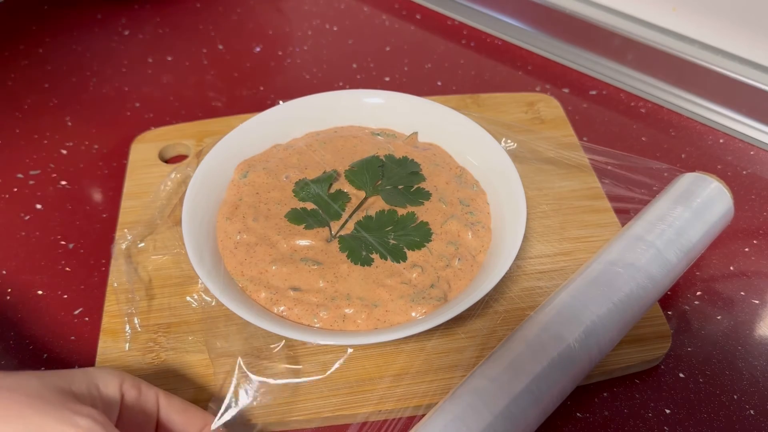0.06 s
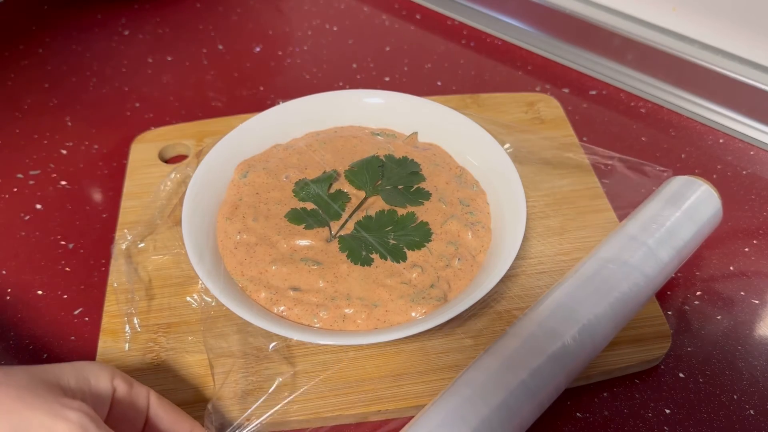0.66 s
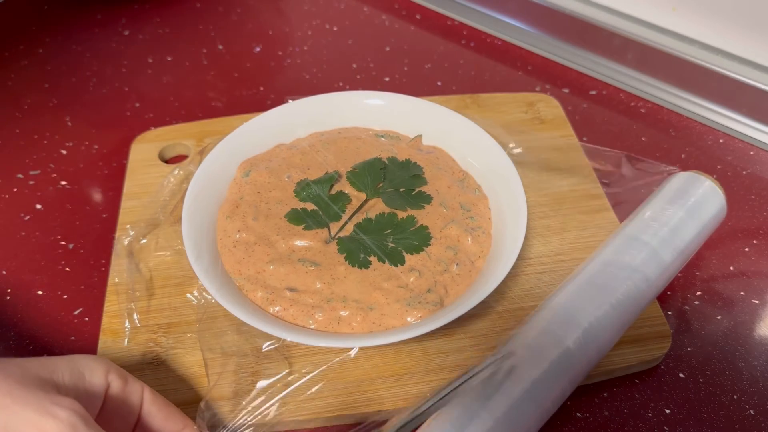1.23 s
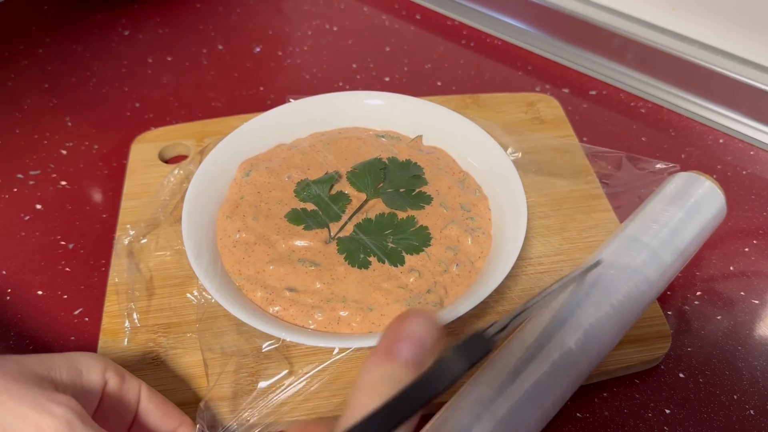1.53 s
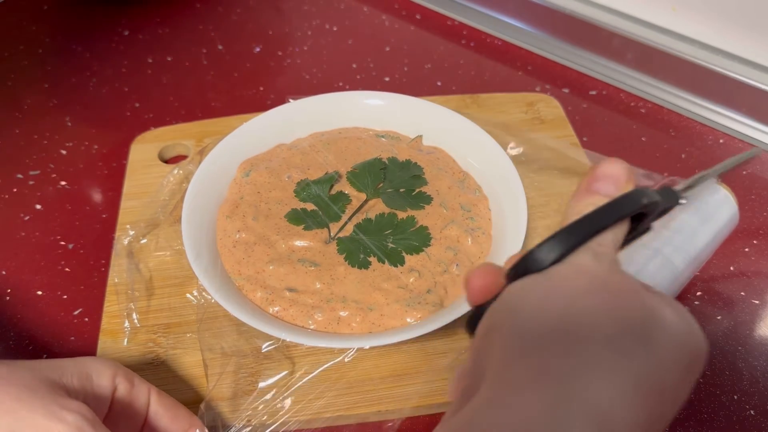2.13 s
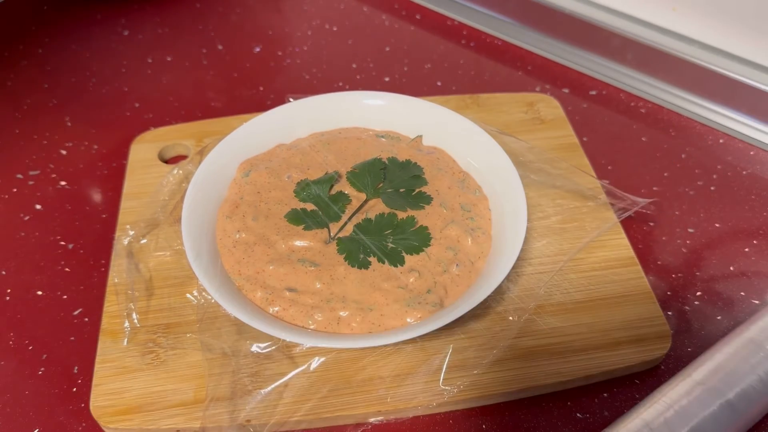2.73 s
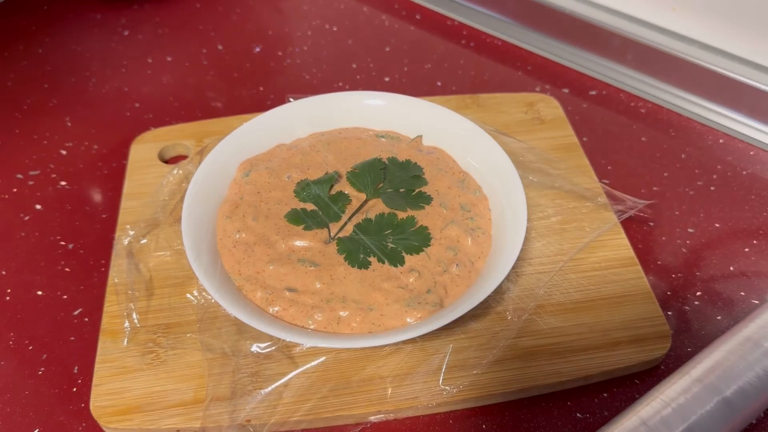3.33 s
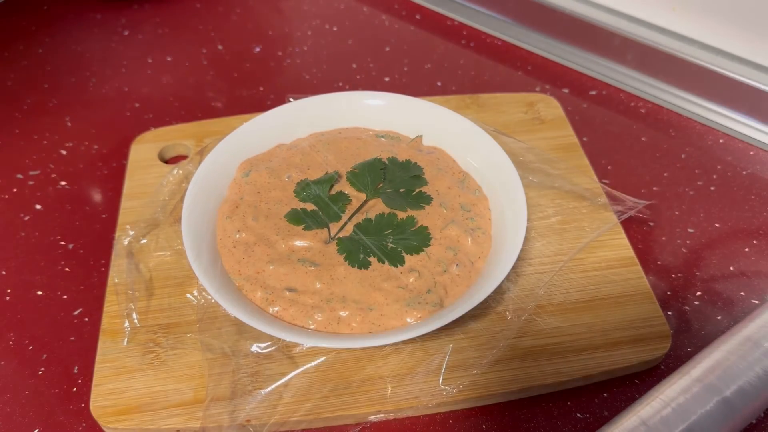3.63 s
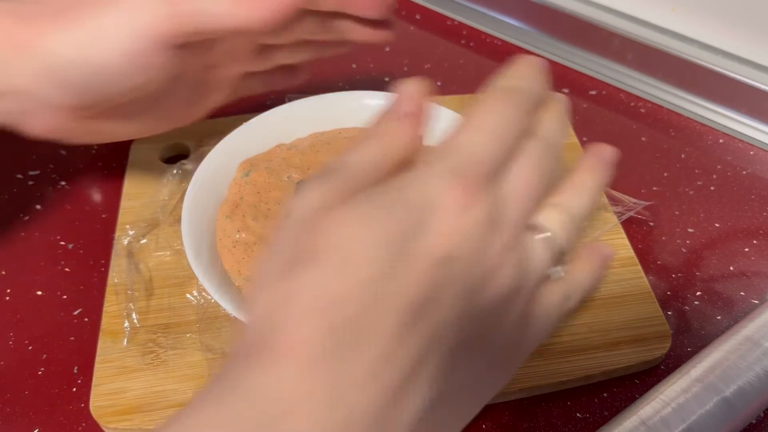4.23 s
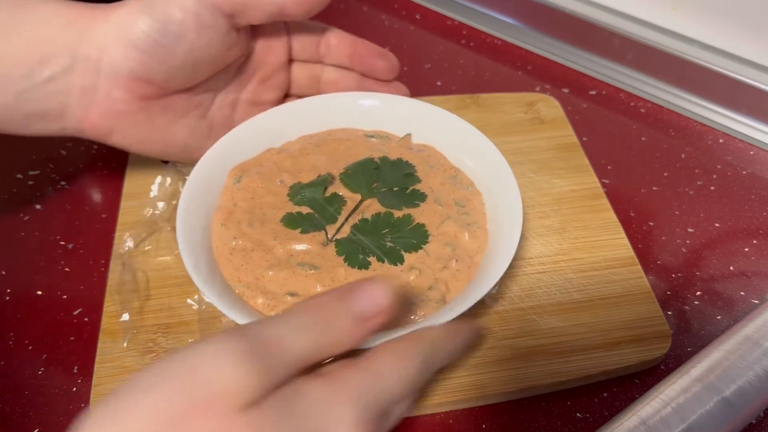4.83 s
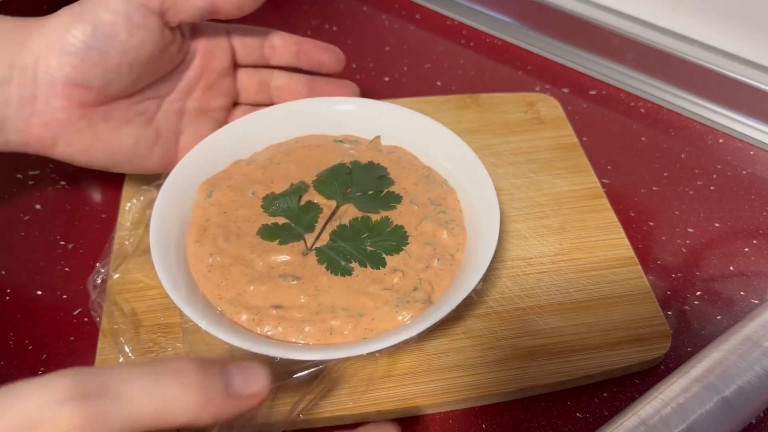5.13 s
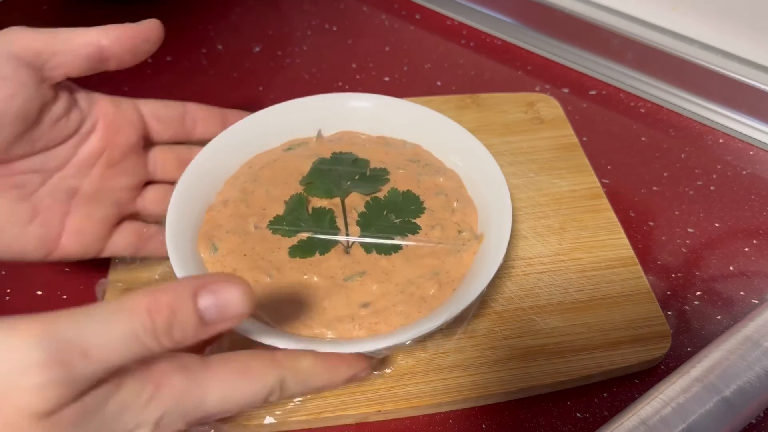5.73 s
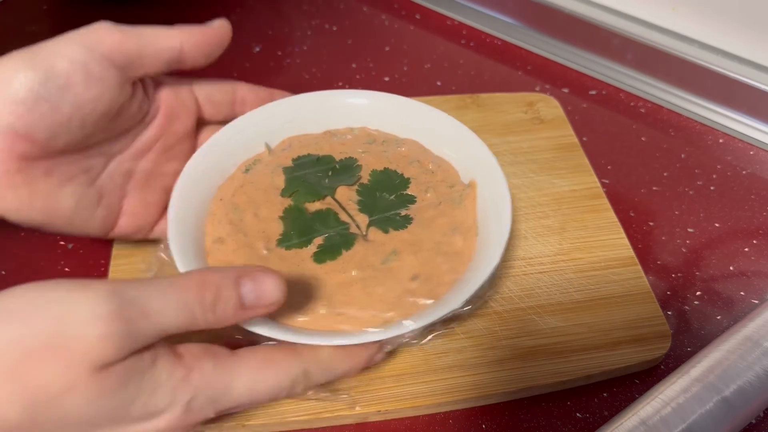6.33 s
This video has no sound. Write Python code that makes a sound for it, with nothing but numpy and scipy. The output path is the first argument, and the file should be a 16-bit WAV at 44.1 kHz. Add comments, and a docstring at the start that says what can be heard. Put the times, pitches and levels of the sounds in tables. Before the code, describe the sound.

Over a steady low appliance hum, plastic wrap crinkles and squeaks as it is stretched, followed by a click of scissor blades and a short slicing rasp. Two loud clatters stand out as first the roll and then the scissors land on the counter. Quieter crackling follows as the wrap is tucked around a bowl, with faint thuds and scrapes on a wooden board. Everything sounds near, with slight kitchen reverberation.

```python
"""Cling film over a bowl

Film peels off its roll in tiny stick-slip events; creases snap, the taut sheet sings in short zips,
and scissors click and slit it. The roll drops on the counter and the scissors land in two knocks,
each impact exciting damped modes. Hands press the crackling film round the bowl and turn it, scraping,
on a wooden board. A small kitchen reverberates, and an appliance hums throughout."""
import sys
import numpy as np
from scipy import signal
from scipy.fft import rfft, irfft, next_fast_len
from scipy.io import wavfile
from scipy.ndimage import map_coordinates

SR = 44100
rng = np.random.default_rng(int(sys.argv[2]) if len(sys.argv) > 2 else 0)


def wav_out(sig):
    """Save sig, one row per channel (or a flat mono array), as 16-bit PCM at SR to the path in sys.argv[1]."""
    wavfile.write(sys.argv[1], SR, np.round(np.clip(np.atleast_2d(sig).T, -1, 1) * 32767).astype(np.int16))


N = 281358

# Levels in the tables are relative: each source applies its own gains.
# The appliance's tones: pitch_hz, level_db
HUM_TONES = [(59.7, -45.5), (119.4, -68), (179.1, -66.5), (479, -78.5), (598, -78.5), (678, -87)]
# Strokes that work the film: start_s, length_s, sheet_db, fizz_db, swell_db
PULL_STROKES = [(0, 0.37, -72.5, -67.5, 3), (.335, 0.23, -58, -61, 7), (.468, 0.073, -55, -51, -9),
                (.6, 0.08, -53, -56.5, -5), (.735, 0.085, -52.5, -52.5, 3), (.875, 0.29, -45.5, -44, 2.5),
                (1.245, 0.082, -46, -47.5, 7.5), (1.44, 0.11, -49, -45, -4), (1.93, 0.11, -55, -54.5, 3.5),
                (2.345, .16, -60.5, -69.5, 1.5)]
PRESS_STROKES = [(4.355, 0.1, -55, -56, 1.5), (4.5, 0.17, -60.5, -62, 6), (4.615, 0.11, -58, -56.5, -0.5),
                 (4.76, 0.067, -60.5, -64, 13), (4.92, 0.27, -62.5, -67, 0.5), (5.24, 0.12, -57.5, -54, 15),
                 (5.44, 0.2, -55.5, -53, 0), (5.685, 0.048, -54.5, -48, 3), (5.8, 0.22, -58, -52.5, 11.5),
                 (5.955, 0.09, -54, -48.5, 8.5), (6.15, 0.17, -61.5, -58.5, 11),
                 (6.295, 0.054, -49.5, -44, 8.5)]
# Strokes of the blades: start_s, length_s, sheet_db, tear_db, swell_db
SLIT_STROKES = [(1.515, 0.29, -38.5, -40, -1), (1.799, 0.1, -38, -37, 3.5)]
# Creases flipping over: start_s, tick_db, pop_hz, pop_over_tick_db
CREASE_SNAPS = [(0.061, -53, 2000, -16), (0.125, -47, 2200, -13), (0.406, -39.5, 2540, -25),
                (0.481, -30.5, 1110, -9), (0.494, -28, 1190, -12), (0.512, -30.5, 1180, -20),
                (0.548, -35, 1900, -14), (0.57, -33, 2200, -20), (0.734, -32, 1110, -9),
                (0.775, -34, 1660, -4), (0.825, -21.5, 1000, -14.5), (0.925, -25, 1380, -15),
                (2.061, -26.5, 1430, -15.5), (2.161, -48.5, 2240, -8), (4.033, -35.5, 3510, -29),
                (4.36, -41.5, 2270, -19), (4.823, -35, 1400, -9), (4.827, -40, 2280, -4),
                (4.915, -32.5, 2320, -16), (5.043, -42.5, 2000, 1), (5.131, -23.5, 2100, -11),
                (5.21, -45, 2000, -12), (5.468, -32, 1190, -6)]
# The taut sheet singing: start_s, length_s, pitch_hz, glide_octaves_per_s, level_db
SHEET_ZIPS = [(0.915, 0.078, 1190, 0.5, -57), (1.066, 0.077, 1384, -7, -45), (1.207, 0.18, 1240, 2, -53.5),
              (1.527, 0.13, 1120, 0.7, -44), (1.679, 0.13, 1550, -4, -46), (1.793, 0.087, 1230, 2, -42.5)]
# Impacts: start_s, level_db, thump_db, clack_db, crack_db, pan_db, contact_t60_s
ROLL_IMPACTS = [(1.269, -22, -0.5, -21, -6, 5.5, 0.038), (1.283, -35, 20.5, -20.5, -10, -1, 0.026),
                (1.319, -42, 4, 1, 6, 5, 0.025), (2.398, -53.5, 34.5, -5, -21.5, 2, 0.3),
                (2.436, -27, 6.5, -17, -10.5, 3.5, 0.3), (2.474, -42.5, 25.5, -10.5, -12.5, 5, 0.054),
                (2.527, -3, 0.5, 1.5, -3, 1, 0.021), (2.543, -23.5, 13.5, -13.5, -10, 0.5, 0.11),
                (2.572, -5, -4, -13.5, -8, 2.5, 0.043), (2.601, -6, -9.5, -4, -9, 1.5, 0.017)]  # bumps the board, then lands
SCISSOR_IMPACTS = [(3.504, -13.5, -1.5, -4.5, 0.5, 2.1, 0.11), (3.506, -19.5, 19, -15, -4, 5.5, 0.023),
                   (3.614, -35.5, 17, 0.5, -2, 3, 0.05), (3.693, -11.5, -4.5, 1, 5.5, 1.1, 0.046),
                   (3.698, -12, 1, 5, 2, 2.8, 0.033)]  # land handle first, rock, drop on their blades
# The blades clicking shut: start_s, tick_db, ring_over_tick_db
BLADE_CONTACTS = [(1.441, -24, -5), (1.448, -23.5, -7), (1.474, -23.5, -5.5), (1.488, -25.5, -1.5),
                  (1.521, -9.5, -9)]
# Movements on the board: start_s, length_s, level_db
BOARD_NUDGES = [(1.295, 0.038, -46), (1.493, 0.04, -56), (1.643, 0.063, -52), (1.76, 0.035, -48.5),
                (4.089, 0.28, -63), (4.4, 0.17, -58), (4.71, 0.23, -58), (4.988, 0.047, -54.5),
                (5.44, 0.16, -57), (5.89, 0.077, -58), (6.285, 0.044, -54.5)]
BOWL_SHOVES = [(4.925, 0.092, -58), (5.374, 0.12, -50.5), (5.543, 0.086, -61.5), (5.782, 0.18, -58.5)]
# Normal modes: pitch_hz, level_db, t60_s
ROLL_MODES = [(88.4, -18.5, 0.3), (139, -7, 0.27), (241.8, -12, 0.15), (311.4, -1.5, 0.073),
              (488.3, -15.5, 0.24), (660, -13, 0.12), (733, -13, 0.2), (848, -13.5, 0.2), (904, -17, 0.23),
              (1100, -8, 0.026), (1320, -6.5, 0.04), (1762, -11.5, 0.039), (2132, -9, 0.065),
              (2430, -7.5, 0.055), (2820, -9, 0.02)]  # roll and counter
BLADE_MODES = [(1170, -6, 0.011), (1530, -4, 0.006), (1700, -1.5, 0.01), (2386, -9.5, 0.018)]
SCISSOR_MODES = [(271, 0.5, 0.099), (288.7, -8.5, 0.19), (325, 4, 0.055), (436, -8, 0.13), (706, -10, 0.22),
                 (1027, -7.5, 0.08), (1358, 1, 0.058), (1576, 0.5, 0.029), (1687, 1.5, 0.041),
                 (2166, -24, 0.39), (3410, -14, 0.068)]  # scissors and counter
# Spectral envelopes: frequency_hz, gain_db
AIR_SPECTRUM = [(25, -13.5), (60, -7.5), (130, -1), (300, -11), (600, -11.5), (1000, -23.5), (2000, -32.5),
                (5000, -31.5), (7000, -27.5), (9500, -23), (11000, -33.5), (13500, -41), (16000, -56)]
SHEET_SPECTRUM = [(150, -20), (450, -4), (600, -2.5), (900, -0.5), (1300, 5), (2300, 0), (3800, -8.5),
                  (7000, -16)]  # film under tension
FIZZ_SPECTRUM = [(1500, -31), (3500, -2), (5500, -5.5), (7500, -3.5), (9500, 0), (11300, -2.5),
                 (13500, 2.5), (15500, 0), (17000, -63)]  # slipping creases
TICK_SPECTRUM = [(200, -12.5), (800, 0.5), (2200, 3.5), (3600, 0.5), (5200, 2.5), (9500, 4), (15000, 4),
                 (17000, 6.5)]
ROLL_SPECTRUM = [(40, -6), (130, 0.5), (400, -0.5), (750, 2.5), (1600, 4.5), (2600, -10), (3500, -16.5),
                 (9000, -23), (16000, -36.5)]
THUD_SPECTRUM = [(40, -11.5), (90, 1), (135, 6), (200, -9.5), (270, 0), (550, -17.5), (1000, -23)]
TEAR_SPECTRUM = [(1500, -27), (2600, -5.5), (3800, -6), (5800, -3.5), (7500, 0.5), (8500, 4.5), (10200, 4),
                 (12500, -0.5), (15000, 2), (17000, -40)]  # the parting edge
SCISSOR_SPECTRUM = [(40, -18.5), (140, 1), (195, -13.5), (300, -2.5), (470, 2.5), (860, -3), (1050, 3.5),
                    (1700, -1), (2000, -9), (3400, -10.5), (4200, -15.5), (9000, -21), (16000, -32)]
RUSTLE_SPECTRUM = [(250, -0.5), (700, -1.5), (1400, 2.5), (2200, 1.5), (3500, -1.5), (5000, -10),
                   (8000, -7)]  # film under the palms
SCRAPE_SPECTRUM = [(150, -49), (275, 8), (400, -6.5), (580, 0.5), (800, 0), (1250, 3.5), (1700, -32),
                   (4000, -33)]
# Stereo width: frequency_hz, side_over_mid_db
STEREO_WIDTH = [(60, -30), (120, -17.5), (250, -5.5), (650, -1.5), (950, -5.5), (1350, 0), (2100, -5),
                (6000, -3), (7800, -2), (9500, -4), (10400, 8.5), (11300, 47), (12400, 2.5), (13500, -8),
                (16000, -24)]
# The kitchen's reverberation time: frequency_hz, t60_s
KITCHEN_DECAY = [(100, 0.84), (400, 0.42), (1400, 0.5), (4000, 0.44), (9000, 0.35), (16000, 0.23)]


def amp(db):
    """Amplitude grows tenfold every 20 dB."""
    return 10 ** (np.asarray(db) / 20)


def unit(x):
    """Normalisation to an rms of 1."""
    return x / np.sqrt(np.mean(x ** 2) + 1e-20)


def along(points, hz):
    """Interpolation on a logarithmic frequency axis."""
    knots_hz, values = np.transpose(points)
    return np.interp(np.log(hz + 1), np.log(knots_hz + 1), values)


def wobble(rate_hz):
    """Smooth random modulation: a spline through Gaussian knots."""
    knots = rng.standard_normal(int(N * rate_hz / SR) + 4)
    return map_coordinates(knots, [np.arange(N) * rate_hz / SR])


def filtered(x, response):
    """Linear filtering multiplies the spectrum by a frequency response."""
    n = x.shape[-1]
    padded = next_fast_len(n + SR // 10)
    return irfft(rfft(x, padded) * response(np.fft.rfftfreq(padded, 1 / SR)), padded)[..., :n]


def coloured(x, gain_db, size=4096):
    """Minimum-phase filtering: folding the cepstrum makes the response causal."""
    cepstrum = irfft(np.log(amp(gain_db(np.fft.rfftfreq(size, 1 / SR)))))
    cepstrum[1:size // 2] *= 2
    cepstrum[size // 2 + 1:] = 0
    return signal.oaconvolve(x, irfft(np.exp(rfft(cepstrum))))[:len(x)]


def shaped(x, spectrum):
    """Source and filter: an excitation takes on a spectral envelope, at rms 1."""
    return unit(coloured(x, lambda hz: along(spectrum, hz)))


def stereo(centre, spread, off_axis_db=0):
    """Mid-side stereo: off-axis sound reaches the two channels out of phase near 1.3 kHz."""
    off_axis = [(500, 0.012), (1300, off_axis_db), (2100, 0.017)]
    angle = lambda hz: np.arctan(amp(along(STEREO_WIDTH, hz) + along(off_axis, hz)))
    mid = filtered(centre, lambda hz: np.cos(angle(hz)))
    side = filtered(spread, lambda hz: 1j * np.sin(angle(hz)))
    return np.array([mid + side, mid - side])


def reflections(x, t60, hop=6144, taps=3072):
    """Early reflections from counter and wall; a new random pattern each hop stands for moving hands."""
    frames = np.lib.stride_tricks.sliding_window_view(np.pad(x, (hop, 2 * hop)), 2 * hop)[::hop]
    echoes = rng.standard_normal((2, len(frames), taps)) * amp(-60 * np.arange(taps) / SR / t60)
    echoes /= np.linalg.norm(echoes, axis=2, keepdims=True)
    heard = signal.fftconvolve((frames * signal.get_window("hann", 2 * hop))[None], echoes, axes=2)
    out = np.zeros((2, len(x) + SR))
    for k in range(len(frames)):
        out[:, k * hop:][:, :heard.shape[2]] += heard[:, k]
    return out[:, hop:hop + len(x)]


def in_kitchen(x, near_db, room_db, near_t60=0.19, off_axis_db=0):
    """Direct sound, early reflections and a diffuse tail whose decay rate depends on frequency."""
    hz, t, noise = signal.stft(rng.standard_normal((2, SR // 2)), SR, nperseg=256)
    tail = signal.istft(noise * amp(-60 * t / along(KITCHEN_DECAY, hz)[:, None]), SR, nperseg=256)[1]
    tail *= 1 - np.exp(-np.arange(tail.shape[1]) / SR / 0.0039)
    room = signal.fftconvolve(x[None], tail / np.linalg.norm(tail[0]), axes=1)[:, :len(x)]
    return stereo(*(x + amp(near_db) * reflections(x, near_t60) + amp(room_db) * room), off_axis_db)


def place(track, start, sound, pan_db):
    """Panning by level difference, left over right; long waves reach both sides alike."""
    balance = lambda hz: amp(np.array([[.5], [-.5]]) * pan_db * along([(130, 0), (260, 1)], hz))
    part = track[:, round(start * SR):][:, :sound.shape[1]]
    part += filtered(sound, balance)[:, :part.shape[1]]


def grains(rate_hz, scatter_db):
    """Stick-slip excitation: a Poisson train of impulses of scattered size."""
    sizes = amp(scatter_db * np.minimum(rng.standard_normal(N), 2)) * rng.choice([-1, 1], N)
    return sizes * (rng.random(N) < rate_hz / SR)


def stroke(start, length, db, attack_s, release_s, swell_db=0):
    """Envelope of one movement: a linear rise, a tilt of swell_db, then a fall of 60 dB in release_s."""
    t = np.arange(N) / SR - start
    swell = swell_db * (np.clip(t / length, 0, 1) - .5)
    return np.clip(t / attack_s, 0, 1) * amp(db + swell - 60 * np.clip((t - length) / release_s, 0, 2))


def power_sum(gains):
    """Incoherent sources add in power."""
    return np.sqrt(sum(gain ** 2 for gain in gains))


def film_envelopes(strokes, attack_s, release_s):
    """One movement drives two envelopes: the sheet's, and that of its fizz or tear."""
    sheet, treble = [], []
    for start, length, sheet_db, treble_db, swell_db in strokes:
        sheet.append(stroke(start, length, sheet_db, attack_s, release_s, swell_db))
        treble.append(stroke(start, length, treble_db, attack_s, release_s, swell_db))
    return power_sum(sheet), power_sum(treble)


def appliance(air_db=-61):
    """Mains-driven vibration gives nearly steady tones over the broadband noise of moving air."""
    t = np.arange(N) / SR
    hum = np.zeros(N)
    for hz, db in HUM_TONES:
        peak = np.sqrt(2) * amp(db + 0.16 * wobble(2.6))
        hum += peak * np.sin(2 * np.pi * (hz * t + rng.random()) + 0.059 * wobble(1.8))
    air = [shaped(rng.standard_normal(N), AIR_SPECTRUM) for _ in range(2)]
    return hum + amp(air_db) * stereo(*air)


def crinkle(envelopes, spectrum, slips, clump_db, sheet_db, fizz_db, tick_db=-2, taut_db=-43):
    """Creases slip in clumps, fizzing and shaking the sheet; folds tick most where the film is slack."""
    sheet_gain, fizz_gain = envelopes
    clumps = slips * amp(clump_db * wobble(130))
    sheet = shaped(clumps * rng.normal(1, 1, N), spectrum)
    slack = np.clip(1 - fizz_gain / amp(taut_db), 0, 1)
    ticks = shaped(grains(45, scatter_db=-5), FIZZ_SPECTRUM)
    fizz = shaped(clumps, FIZZ_SPECTRUM) + slack * amp(tick_db) * ticks
    return amp(sheet_db) * sheet_gain * sheet + amp(fizz_db) * fizz_gain * fizz


def film_pulls():
    """Peeling is stick-slip motion: the film leaves the roll in slips of very uneven size."""
    envelopes = film_envelopes(PULL_STROKES, attack_s=0.016, release_s=0.33)
    slips = grains(5300, scatter_db=4)
    return crinkle(envelopes, SHEET_SPECTRUM, slips, clump_db=1.06, sheet_db=-2.5, fizz_db=-3)


def tick(t, attack_s, t60):
    """A brief transient has a broad spectrum: a noise burst of peak 1."""
    burst = rng.standard_normal(len(t)) * amp(-60 * t / t60) * (1 - np.exp(-t / attack_s))
    crack = coloured(burst, lambda hz: along(TICK_SPECTRUM, hz))
    return crack / np.abs(crack).max()


def crease_snaps(pop_t60=0.013):
    """Snap-through buckling: a crease flips with a tick, and the film around it pops at one pitch."""
    out, t = np.zeros((2, N)), np.arange(SR // 4) / SR
    for start, db, hz, pop_db in CREASE_SNAPS:
        pop = amp(pop_db - 60 * t / pop_t60) * np.sin(2 * np.pi * hz * t)
        snap = amp(db + 1.5) * (tick(t, attack_s=0.00039, t60=0.0094) + pop)
        place(out, start, in_kitchen(snap, near_db=1, room_db=-9, near_t60=0.058), pan_db=3)
    return out


def sheet_zips(upper_ratio=1.8, upper_db=-8, attack_s=0.023, release_s=0.23):
    """Two membrane resonances, driven by slips, glide as the free span and its tension change."""
    hz, t, slips = signal.stft(grains(1800, scatter_db=3.5), SR, nperseg=1024)
    resonance = lambda ratio: 1 / (1 + ((ratio - 1) / .08) ** 2)
    out = np.zeros(N)
    for start, length, pitch_hz, glide, db in SHEET_ZIPS:
        octaves = glide * np.clip(t - start, 0, length + attack_s)
        ratio = hz[:, None] / (pitch_hz * 2 ** octaves)
        response = resonance(ratio) + amp(upper_db) * resonance(ratio / upper_ratio)
        sung = signal.istft(slips * response, SR, nperseg=1024)[1][:N]
        out += stroke(start, length, db, attack_s, release_s) * unit(sung)
    return out


def knocks(impacts, modes, spectrum, thump_hz, ring_db, clatter_db,
           clatter_room_db, ring_room_db, near_t60, off_axis_db):
    """An impact excites damped modes and a noisy clatter; soft contacts thump, hard ones clack."""
    out, t = np.zeros((2, N)), np.arange(SR // 2) / SR
    mode_hz, mode_db, t60 = np.transpose(modes)[:, :, None]
    for start, db, thump_db, clack_db, crack_db, pan_db, contact_t60 in impacts:
        force = [(thump_hz, thump_db), (750, 0), (1600, clack_db), (4000, crack_db)]
        sizes = amp(mode_db + along(force, mode_hz) + rng.standard_normal(mode_hz.shape))
        build_up = 1 - np.exp(-t * mode_hz / 2)  # low modes rise more slowly
        detuned_hz = mode_hz * rng.normal(1, 0.0058, mode_hz.shape)
        partials = sizes * build_up * amp(-60 * t / t60) * np.sin(2 * np.pi * detuned_hz * t)
        ring = amp(db + ring_db) * partials.sum(0)
        contact = amp(db + clatter_db - 60 * t / contact_t60) * (1 - np.exp(-t / 0.00028))
        chatter = contact * rng.standard_normal(len(t))
        clatter = coloured(chatter, lambda hz: along(spectrum, hz) + along(force, hz))
        heard = in_kitchen(ring, near_db=-11.5, room_db=ring_room_db, off_axis_db=off_axis_db)
        heard += in_kitchen(clatter, near_db=-10, room_db=clatter_room_db,
                            near_t60=near_t60, off_axis_db=off_axis_db)
        place(out, start, heard, pan_db)
    return out


def roll_knocks():
    """Each bump and bounce sets roll and counter in free vibration."""
    return knocks(ROLL_IMPACTS, ROLL_MODES, ROLL_SPECTRUM, thump_hz=145, ring_db=-8.5, clatter_db=8,
                  clatter_room_db=-8, ring_room_db=-11.5, near_t60=0.14, off_axis_db=3)


def board_thuds():
    """Forced vibration: hands and roll jostle the board, which answers at low frequencies."""
    leaning = power_sum(stroke(*row, attack_s=0.017, release_s=0.57) for row in BOARD_NUDGES)
    return leaning * amp(2.5 * wobble(17)) * shaped(grains(900, scatter_db=2.5), THUD_SPECTRUM)


def blade_clicks():
    """Steel strikes steel with a sharp tick; damping by the hand cuts the blades' modes short."""
    out, t = np.zeros((2, N)), np.arange(SR // 4) / SR
    for start, db, ring_db in BLADE_CONTACTS:
        ring = sum(amp(ring_db + mode_db - 60 * t / t60) * np.sin(2 * np.pi * (hz * t + rng.random()))
                   for hz, mode_db, t60 in BLADE_MODES)
        click = amp(db + 1.5) * (tick(t, attack_s=0.00013, t60=0.0099) + ring)
        place(out, start, in_kitchen(click, near_db=0.5, room_db=-7, near_t60=0.047), pan_db=3)
    return out


def film_slit(hiss_db=-3.5, tear_db=-2):
    """Fracture advances in tiny rips, while friction makes the sheet hiss along the steel."""
    hiss_gain, tear_gain = film_envelopes(SLIT_STROKES, attack_s=0.006, release_s=0.094)
    rips = shaped(grains(850, scatter_db=3.5), TEAR_SPECTRUM)
    hiss = shaped(grains(9400, scatter_db=-0.5), SHEET_SPECTRUM)
    return amp(hiss_db) * hiss_gain * hiss + amp(tear_db) * tear_gain * rips


def scissor_knocks():
    """Handles, then blades, strike the counter and excite the modes of both bodies."""
    return knocks(SCISSOR_IMPACTS, SCISSOR_MODES, SCISSOR_SPECTRUM, thump_hz=300, ring_db=-4.5,
                  clatter_db=8.5, clatter_room_db=-6.5, ring_room_db=-17.5,
                  near_t60=0.098, off_axis_db=1.5)


def film_presses():
    """Under the palms, dense slips of similar size merge into a fine rustle."""
    envelopes = film_envelopes(PRESS_STROKES, attack_s=0.014, release_s=0.37)
    slips = grains(4900, scatter_db=-1.5)
    return crinkle(envelopes, RUSTLE_SPECTRUM, slips, clump_db=1.5, sheet_db=3, fizz_db=-2.5)


def bowl_scrapes():
    """Sliding friction: the bowl's foot sticks and slips on the wood with each shove."""
    shoving = power_sum(stroke(*row, attack_s=0.017, release_s=0.13) for row in BOWL_SHOVES)
    return shoving * amp(0.77 * wobble(43)) * shaped(grains(1200, scatter_db=2.5), SCRAPE_SPECTRUM)


def scene():
    """Superposition: the pressures of all sources add in the kitchen."""
    film = film_pulls() + sheet_zips() + film_slit() + film_presses()
    film = in_kitchen(film, near_db=-1, room_db=-13, near_t60=0.051)
    board = in_kitchen(board_thuds() + bowl_scrapes(), near_db=-3.5, room_db=-4)
    return appliance() + film + crease_snaps() + roll_knocks() + board + blade_clicks() + scissor_knocks()


def record(dry, ceiling=0.85, low_hz=42, top_hz=16150):
    """Soft saturation rounds the highest peaks; band limiting removes the deepest bass and top treble."""
    rounded = dry / (1 + np.abs(dry / ceiling) ** 6) ** (1 / 6)
    bass_cut = signal.sosfilt(signal.butter(4, low_hz, "highpass", fs=SR, output="sos"), rounded)
    return filtered(bass_cut, lambda hz: 1 / (1 + (hz / top_hz) ** 120))


dry = scene()
out = record(dry)
wav_out(out)
```